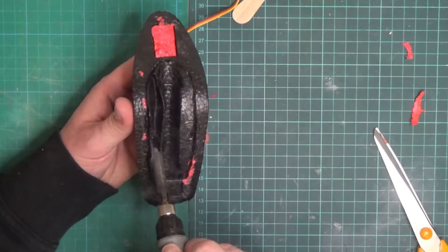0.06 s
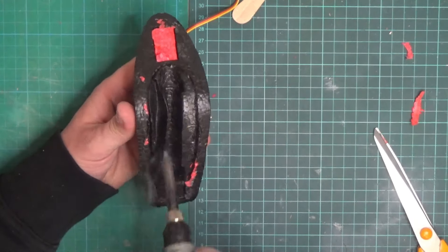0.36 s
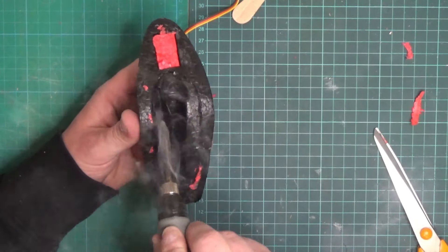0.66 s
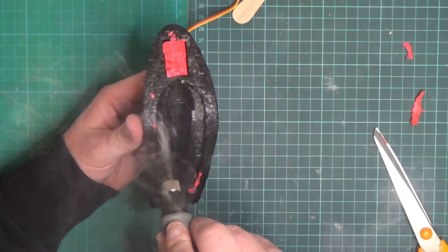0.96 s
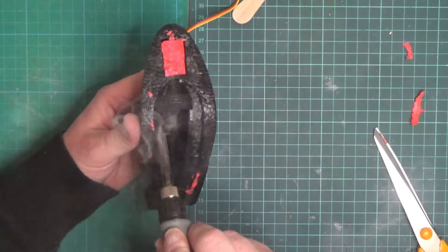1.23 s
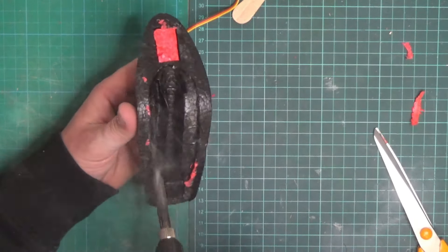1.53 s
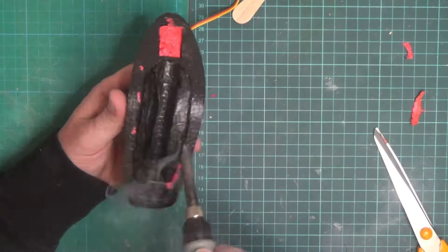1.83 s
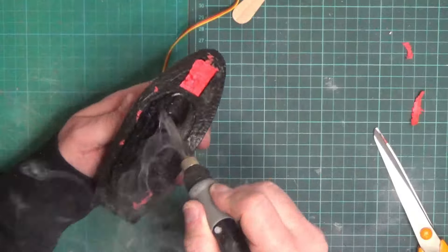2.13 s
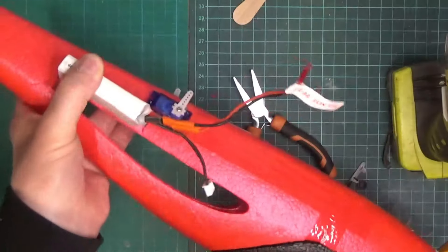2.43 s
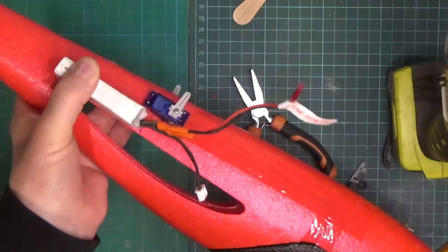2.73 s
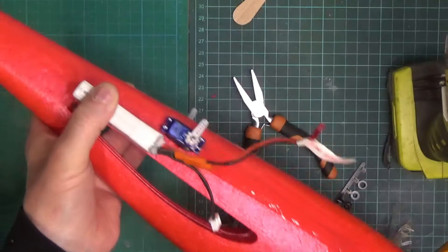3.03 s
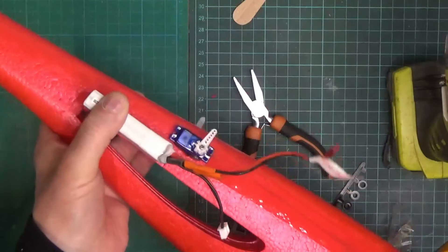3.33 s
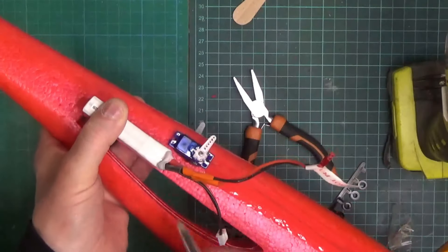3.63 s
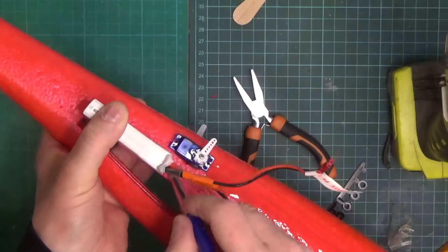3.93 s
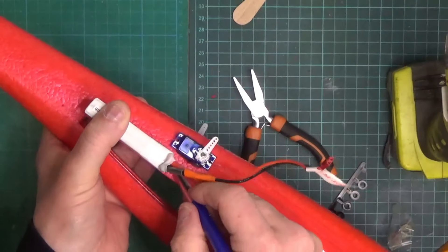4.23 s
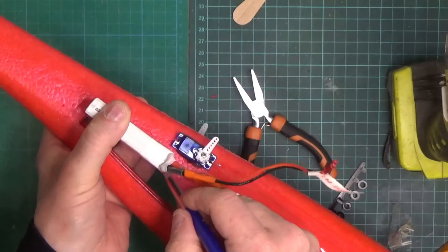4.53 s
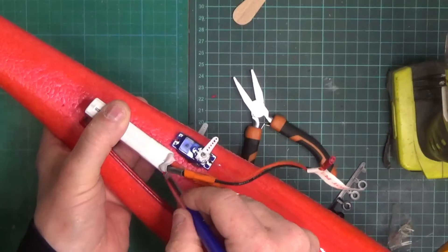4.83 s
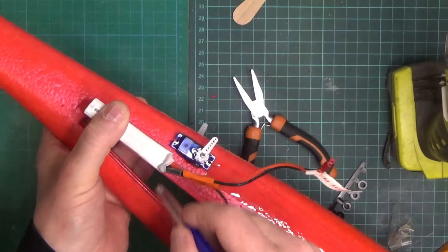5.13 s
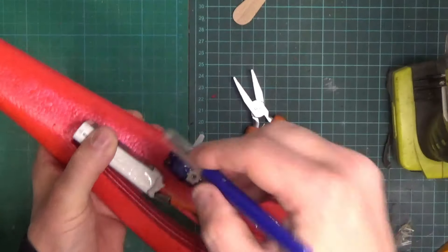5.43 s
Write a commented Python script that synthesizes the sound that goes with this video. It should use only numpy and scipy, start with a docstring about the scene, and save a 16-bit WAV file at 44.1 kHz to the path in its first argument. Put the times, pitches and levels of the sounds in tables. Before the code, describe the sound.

A hot iron melts through the foam canopy of a model plane with a faint, fine sizzle that swells with each push. Then hands turn the hollow fuselage: skin swishes over it, the shell knocks and snaps, and the foam creaks in the grip. A knife then picks lightly at the foam. It is all close by in a small room, with soft room air, a thin high whine and, once the handling starts, a faintly ticking fan.

```python
"""A faint, fine sizzle: a hot iron melts through the foam canopy of a model plane, close by in a small room.
Then hands turn the hollow fuselage: skin swishes over it, beads stick and slip in creaks, and the shell
knocks and snaps. A knife picks lightly at the foam. Room air and a thin high whine lie behind it all,
and a fan ticks from the moment the handling starts."""
import sys
import numpy as np
from scipy import signal
from scipy.fft import rfft, irfft
from scipy.io import wavfile
from scipy.ndimage import uniform_filter1d

SR = 44100
rng = np.random.default_rng(int(sys.argv[2]) if len(sys.argv) > 2 else 0)


def unload_audio(sound):
    """Save the sound as a 16-bit wav file, at the path given as the first command line argument."""
    columns = np.transpose(np.atleast_2d(sound))
    # keep every value between -1 and 1, then stretch to whole-number steps
    steps = np.round(np.clip(columns, -1, 1) * 32767)
    wavfile.write(sys.argv[1], SR, steps.astype(np.int16))


N = 245637
T = np.arange(N) / SR
HZ = np.maximum(np.fft.rfftfreq(N, 1 / SR), 1)
HANDLING_S = 2.231  # the iron stops and the hands take over


def amp(db):
    """Decibels to gain."""
    return 10 ** (np.asarray(db) / 20)


def unit(x):
    """Scale to rms 1."""
    return x / np.sqrt(np.mean(x ** 2) + 1e-24)


def noise():
    """White noise."""
    return rng.standard_normal(N)


def shape(x, gain):
    """Filter by a gain for each frequency."""
    return irfft(rfft(x) * gain, N)


def colour(points):
    """EQ curve through (f/Hz, level/dB) points."""
    hz, db = np.transpose(points)
    return amp(np.interp(np.log(HZ), np.log(hz), db))


def resonance(hz, width):
    """Response of one resonance, gain 1 at its centre."""
    return 1 / (1 + 1j * (HZ ** 2 - hz ** 2) / (HZ * width))


def grains(per_s, spread_db):
    """Tiny clicks at random moments, a few much larger than the rest."""
    size = amp(spread_db * np.minimum(rng.exponential(size=N), 4))
    return unit((rng.random(N) < per_s / SR) * size * np.sign(noise()))


def swell(s, hold, rise_s, fall_s):
    """Envelope that grows up to time s, holds and dies away."""
    return np.exp(np.minimum(T - s, 0) / rise_s - np.maximum(T - s - hold, 0) / fall_s)


def add(track, s, sound):
    """Mix a sound into a track from time s."""
    i = max(int(s * SR), 0)
    track[i:i + len(sound)] += sound[:N - i]


def echoes(x, t60):
    """Dense short reflections, in the shell or off the bench and walls."""
    t = T[:SR // 3]
    tail = rng.standard_normal(len(t)) * amp(-60 * t / t60)
    return signal.oaconvolve(x, tail / np.linalg.norm(tail))[:N]


def strokes(rows, body, per_s, spread_db, attack, release_s):
    """Sliding contacts: dense slips ring the body, swell for a share of the stroke, hold and die away."""
    out, t = np.zeros(N), T[:SR // 5]
    slips = shape(grains(per_s, spread_db), body)
    octaves = np.log2(np.maximum(np.fft.rfftfreq(len(t), 1 / SR), 1))
    for s, length, db, tilt_db in rows:
        start = rng.integers(N - len(t))
        rub = unit(irfft(rfft(slips[start:start + len(t)]) * amp(tilt_db * octaves)))
        speed = np.minimum(t / (attack * length), 1) * np.exp(-np.maximum(t - length, 0) / release_s)
        add(out, s, amp(db) * speed * rub)
    return out


def air(iron_db=-67, handling_db=-61):
    """Room tone: a soft rush with wavering hums and a high whine, stepping up as the handling starts."""
    # EQ of the rush behind the iron, and behind the handling: f/Hz, level/dB
    iron_eq = [(15, -44), (25, -4), (107, -5.5), (130, -8.5), (203, -3), (375, -7), (404, -8), (826, -11.5),
               (1190, -13.5), (1320, -10.5), (2380, -17), (9000, -27), (11700, -69), (19800, -120)]
    handling_eq = [(15, -16), (30, -5.5), (160, -2.5), (290, -5.5), (600, -10.5), (1000, -14.5),
                   (1300, -11.5), (2300, -17.5), (3600, -21), (5900, -23.5), (9000, -23), (11500, -51)]
    # hums and whine: f/Hz, width/Hz, level behind the iron/dB, level behind the handling/dB
    tones = [(161.5, 25, -76.5, -72.5), (283.8, 25, -80.5, -73.5), (810, 37, -83, -75),
             (1203, 20, -101, -90), (1305, 16, -79, -93), (8070, 24, -87.5, -92), (9950, 900, -79.5, -72.5),
             (9990, 58, -75.5, -71)]
    late_rush = amp(handling_db) * unit(shape(noise(), colour(handling_eq)))
    early_rush = amp(iron_db) * unit(shape(noise(), colour(iron_eq)))
    early_power = late_power = 0
    for hz, width, early_db, late_db in tones:
        peak = unit(np.abs(resonance(hz, width)) ** 2)
        early_power += (amp(early_db) * peak) ** 2
        late_power += (amp(late_db) * peak) ** 2
    late = late_rush + shape(noise(), np.sqrt(late_power))
    early = early_rush + shape(noise(), np.sqrt(early_power))
    return np.where(T < HANDLING_S, early, late)


def fan(turn_hz=25.04, gain_db=-74, brush_s=0.0033):
    """Three blades brush something on every turn, one harder than the others."""
    ticks = np.zeros(N)
    times = np.arange(HANDLING_S, T[-1], 1 / (3 * turn_hz))
    blade_db = np.resize([0, -4, -5], len(times)) + 1.6 * rng.standard_normal(len(times))
    ticks[(times * SR).astype(int)] = amp(blade_db)
    rub = signal.lfilter([1], [1, -np.exp(-1 / (brush_s * SR))], ticks) * noise()
    brush = unit(shape(rub, resonance(3650, 1400) ** 2))
    housing = resonance(2766, 174) ** 2 + 0.87 * resonance(1260, 250) ** 2
    return amp(gain_db) * (unit(shape(ticks, housing)) + .5 * brush)


def scrapes():
    """The iron or the knife blade catches lightly on the foam."""
    # tool strokes: t/s, length/s, level/dB, tilt/(dB per octave)
    touches = [(.530, 0.014, -64, -2), (1.025, .015, -59, 6), (1.46, 0.033, -51, 7.5),
               (1.755, 0.021, -63.5, 1.5), (1.89, 0.014, -63, 1.5), (3.45, 0.041, -55.5, -2),
               (3.575, 0.011, -58, -2), (3.791, .0024, -52.5, 4), (3.905, 0.049, -57, 0),
               (4.055, 0.017, -58.5, -0.5), (5.091, .0033, -50, 14), (5.29, 0.091, -58.5, -0.5),
               (5.40, 0.099, -57, -3)]
    # EQ of the scrape: f/Hz, level/dB
    scrape_eq = [(40, -31), (400, -2), (1200, 2), (2500, -0.5), (4200, -1), (6000, -4.5), (8200, -1.5),
                 (10000, 1.5), (11200, -11)]
    return strokes(touches, colour(scrape_eq), per_s=5000, spread_db=2.5, attack=.6, release_s=.009)


def iron(gain_db=-4, simmer_db=-77, cool_s=0.004, cool_share=0.43, bench_echo=0.26, bench_s=.00157):
    """Foam cells burst against the hot tip: a fizz that follows each push, with an echo off the bench."""
    # pushes into the foam: t at full depth/s, hold/s, rise/s, relative level/dB
    pushes = [(.01, 0.35, 0.022, -56), (0.532, .005, 0.01, -49), (1.027, .005, 0.019, -59),
              (1.478, 0.028, .14, -51.5), (1.475, 0.0079, 0.023, -47), (1.783, .005, 0.018, -57.5),
              (2.16, 0.072, 0.055, -62)]
    # EQ of the fizz: f/Hz, level/dB
    sizzle_eq = [(1000, -12), (2500, -11.5), (4200, -11), (5500, -11.5), (7300, -10.5), (8100, -5),
                 (8700, -8), (9600, 2), (10400, -2.5), (11200, -6.5)]
    power = amp(simmer_db) ** 2  # the tip resting in the cut
    for s, hold, rise_s, db in pushes:
        power += (amp(db) * swell(s, hold, rise_s, cool_s + cool_share * rise_s)) ** 2
    comb = 1 + bench_echo * np.exp(-2j * np.pi * HZ * bench_s)
    fizz = unit(shape(grains(per_s=13000, spread_db=4), colour(sizzle_eq) * comb))
    return amp(gain_db) * np.sqrt(power) * fizz * (T < HANDLING_S)


def creaks(coarse_db=-2, hiss_db=-1, split_hz=3500, roll_hz=7, grip_s=0.023, let_go_s=0.041):
    """Foam beads stick and slip under the fingers and ring the shell; a fine hiss rides on top."""
    # slides in the grip: t/s, length/s, relative level/dB, treble offset/dB
    slides = [(2.423, .025, -45.5, -7), (2.5, 0.089, -52, -8.5), (2.626, 0.15, -57, -7.5),
              (2.741, 0.037, -44, -22), (2.811, .19, -43.5, -11.5), (3.017, 0.13, -46.5, -10),
              (3.085, 0.13, -43.5, -9), (3.249, 0.11, -47.5, -8), (3.385, 0.25, -56.5, -7.5),
              (3.684, .2, -57, -8)]
    # EQ of the dragged foam: f/Hz, level/dB
    drag_eq = [(24, -45), (40, -6), (69, -0.5), (139, 1.5), (180, 7), (244, -2), (309, 4), (640, -7),
               (1020, 1), (1130, -10), (1330, -6), (2030, -11), (2690, -13), (3640, -7.5), (11000, -4.5),
               (14300, -82), (22000, -120)]
    push = hiss = 0
    for s, length, db, treble_db in slides:
        attack = np.clip((T - s) / grip_s, 0, 1)
        release = np.exp(-np.maximum(T - s - length, 0) / let_go_s)
        slide = amp(db) * attack * release
        push = np.hypot(push, slide)
        hiss = np.hypot(hiss, amp(treble_db) * slide)
    lowpass = 1 / np.sqrt(1 + (HZ / split_hz) ** 8)
    body = colour(drag_eq) * (1 + resonance(1330, 120) + 1.6 * resonance(2650, 154))
    slips = grains(per_s=700, spread_db=3.6)
    # the load rolls from finger to finger, and each spot rings differently
    roll = 2 * np.pi * roll_hz * T
    shell = sum(echoes(slips * load, t60=0.034) for load in (np.cos(roll), np.sin(roll)))
    coarse = unit(shape(0.6 * slips + shell, body * lowpass))
    fine = unit(shape(grains(per_s=6100, spread_db=2), body * (1 - lowpass)))
    return amp(coarse_db) * push * coarse + amp(hiss_db) * hiss * fine


def swishes(hiss_db=-15):
    """Skin slides fast over the foam, stirring broad resonances over a wide hiss."""
    # hand strokes: t/s, length/s, level/dB, tilt/(dB per octave)
    swipes = [(2.231, 0.006, -43, 0), (2.24, .049, -54.5, -.5), (2.307, 0.001, -42, 0),
              (2.318, 0.013, -44, -0.5), (2.35, 0.022, -35.5, 0), (2.376, 0.016, -35.5, -1),
              (2.398, 0.041, -37, 0), (2.539, 0.028, -45, 0.5), (2.752, 0.028, -42, 0),
              (2.777, 0.053, -40, 1), (3.095, 0.023, -53, -2), (3.16, 0.038, -45, -1.5)]
    # resonances of the sliding contact: f/Hz, width/Hz, level/dB
    formants = [(357, 590, -0.5), (790, 300, 2.5), (1160, 550, 0.5), (2050, 1700, -3.5), (2780, 250, -2),
                (3730, 860, 0.5), (4860, 660, -3), (6820, 2300, -8), (8830, 1900, -4), (9800, 1300, -3.5)]
    peaks = sum(amp(db) ** 2 * np.abs(resonance(hz, width)) ** 4 for hz, width, db in formants)
    skin = np.sqrt(peaks + np.abs(amp(hiss_db) * resonance(1100, 18000)) ** 2)
    return strokes(swipes, skin, per_s=9000, spread_db=1.5, attack=.35, release_s=.012)


def friction():
    """All that sizzles, slides and scrapes on the foam."""
    return iron() + swishes() + scrapes() + creaks()


def snaps(rise_s=0.00036, grit=0.088):
    """A stuck spot lets go at once and rings briefly at its own pitch."""
    # snaps of foam and small hard parts: t/s, f/Hz, t60/s, level/dB
    releases = [(1.765, 2570, .06, -63), (2.2309, 1324, 0.091, -43), (2.3596, 3440, 0.0047, -21.5),
                (2.36, 2280, 0.01, -23), (2.3851, 1650, 0.0031, -19.5), (2.516, 3790, 0.023, -38.5),
                (2.517, 1270, 0.019, -40.5), (2.738, 2710, 0.026, -45.5), (2.777, 1246, 0.039, -35),
                (3.252, 1196, 0.028, -41), (3.368, 4080, .015, -46), (3.7615, 4300, .013, -48.5),
                (3.761, 2610, 0.013, -46), (3.813, 4320, 0.01, -45), (3.813, 2680, 0.012, -44),
                (5.421, 2700, .032, -53)]
    out, t = np.zeros(N), T[:SR // 10]
    for s, hz, t60, db in releases:
        rasp = unit(uniform_filter1d(rng.standard_normal(len(t)), size=5))
        ring = np.sin(2 * np.pi * hz * t) + grit * rasp
        fade = (1 - np.exp(-t / rise_s)) * amp(-60 * t / t60)
        add(out, s, amp(db) * ring * fade / fade.max())
    return out


def knocks(crack_db=-12.5, rattle=0.29, rattle_s=0.02, flex_s=0.0022):
    """Each blow rings the shell as a thump, a hollow knock and a crack; crushed beads rattle with it."""
    # modes of the hollow fuselage: f/Hz, t60/s, relative level/dB
    modes = [(115, 0.043, -15), (192.6, 0.044, 2), (246, 0.033, 0.5), (292, 0.045, 0.5), (350, 0.14, -20),
             (528, 0.03, 4), (781, 0.028, -4), (905, 0.024, -2), (1005, 0.012, 6), (1270, 0.053, -6),
             (1720, 0.011, -36), (2060, 0.045, 18), (2720, 0.03, 31), (2950, 0.0045, 24), (3800, 0.031, 20),
             (4930, 0.009, 32)]
    # blows on the fuselage: t/s, thump level/dB, knock level/dB
    blows = [(0.88, -68, -90), (2.307, -33, -51), (2.328, -49, -71), (2.3601, -36.5, -38.5),
             (2.385, -38.5, -39.5), (2.502, -54.5, -71), (2.650, -45, -47), (2.688, -52, -76),
             (2.738, -51, -49.5), (2.831, -47.5, -49), (2.871, -50, -48.5), (2.969, -67, -57),
             (3.196, -48.5, -52.5), (3.218, -50, -51), (3.284, -41.5, -75), (3.303, -44, -62),
             (3.337, -58, -47.5), (3.368, -52, -50.5), (3.670, -52, -55.5), (3.764, -49, -47),
             (3.815, -69, -55)]
    edges_hz = [100, 450, 1900, 5000]  # thump, knock and crack lie between these
    out, t = np.zeros(N), T[:SR // 5]
    hz, t60, mode_db = np.transpose(modes)
    fades = amp(mode_db[:, None] - 60 * t / t60[:, None])
    attack = 1 - np.exp(-t / flex_s)
    for s, thump_db, knock_db in blows:
        detune, phase = rng.standard_normal((2, len(hz)))
        pitches = hz * (1 + 0.026 * detune)
        rings = fades * np.sin(2 * np.pi * np.outer(pitches, t) + .5 * phase[:, None])
        for lo, hi, db in zip(edges_hz, edges_hz[1:], (thump_db, knock_db, knock_db + crack_db)):
            band = signal.butter(2, [lo, hi], "band", fs=SR, output="sos")
            ring = signal.sosfilt(band, rings[(hz >= lo) & (hz < hi)].sum(0) * attack)
            beads = signal.sosfilt(band, rng.standard_normal(len(t)) * np.exp(-t / rattle_s))
            blow = unit(ring) + rattle * unit(beads)
            add(out, s, amp(db) * blow / np.std(blow[:SR // 50]))  # the first 20 ms set the level
    return out


def scene(room_db=-17, blow_side_db=-3):
    """The faint iron work sounds diffuse; the fuselage is close and straight ahead in a wide room."""
    # side-channel EQ of the fuselage, and of the room air: f/Hz, level/dB
    fuselage_width = [(30, -17), (150, -24), (300, -21.5), (600, -14.5), (1300, -9.5), (3000, -9),
                      (8000, -8.5)]
    air_width = [(30, -21), (150, -15), (300, -8), (600, -2.5), (3000, -1.5), (10000, -9)]
    blows = knocks() + snaps()
    work = friction() + blows + fan()
    mid = work + amp(room_db) * echoes(work, t60=0.41) + air()
    # fresh grains and noise in the side channel spread the image
    scattered = friction() + amp(blow_side_db) * echoes(blows, t60=0.07)
    wide_air = air()
    close = shape(scattered, colour(fuselage_width)) + shape(wide_air, colour(air_width))
    side = np.where(T < HANDLING_S, scattered + wide_air, close)
    return np.array([mid + side, mid - side])


def record(dry, top_hz=11100):
    """The microphone leans a little left in the treble; the top is cut steeply."""
    lean = colour([(2500, 0), (5000, 0.54), (10000, 0)])
    tilted = np.array([shape(dry[0], lean), shape(dry[1], 1 / lean)])
    return signal.sosfilt(signal.ellip(12, .2, 70, top_hz, fs=SR, output="sos"), tilted)


dry = scene()
out = record(dry)
unload_audio(out)
```